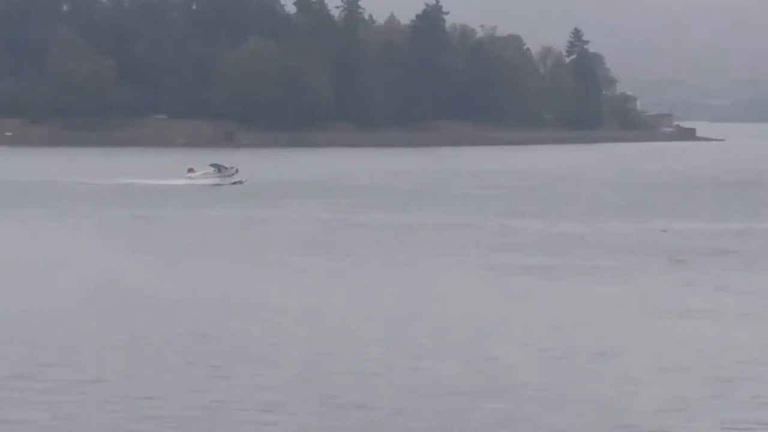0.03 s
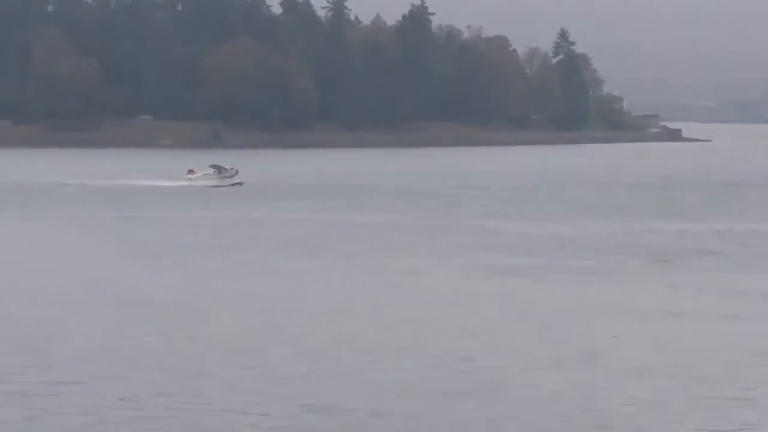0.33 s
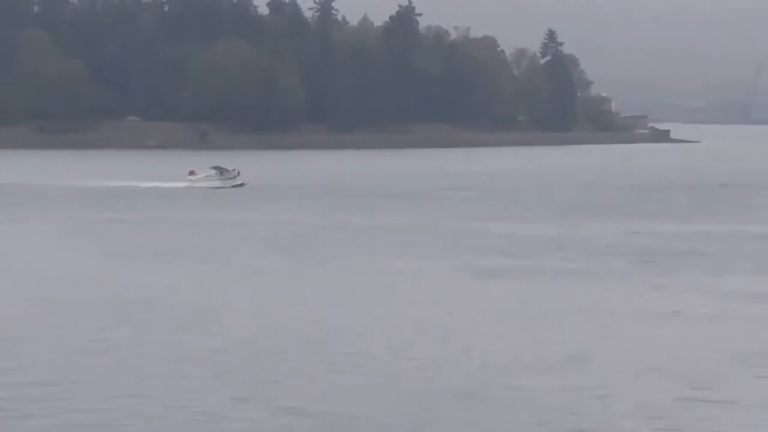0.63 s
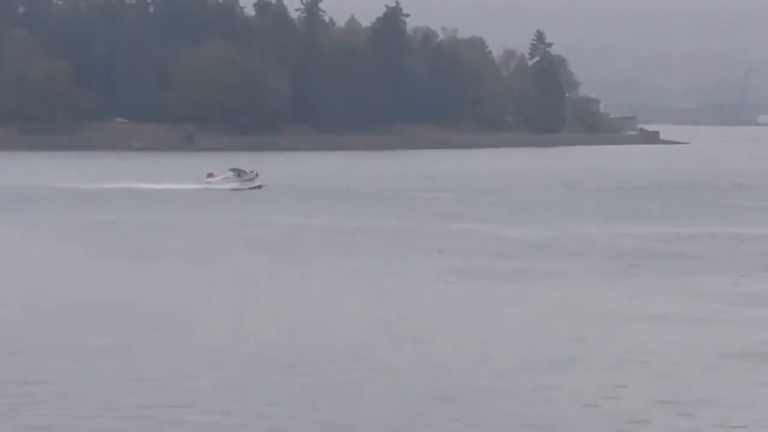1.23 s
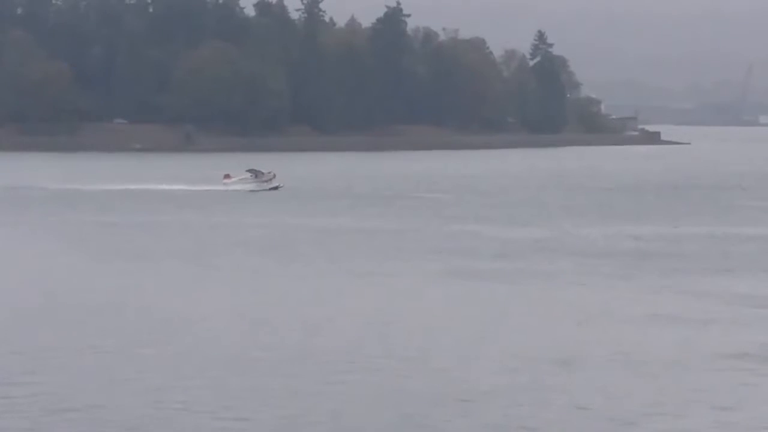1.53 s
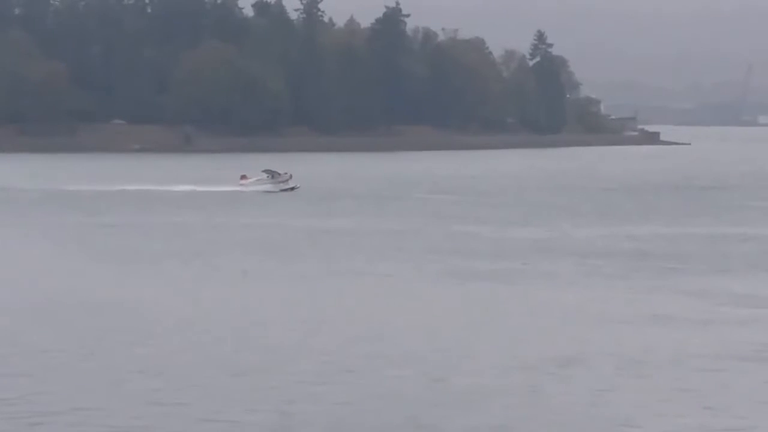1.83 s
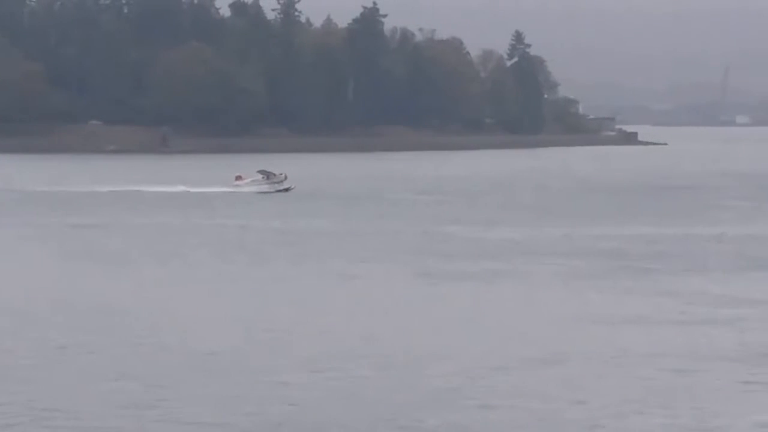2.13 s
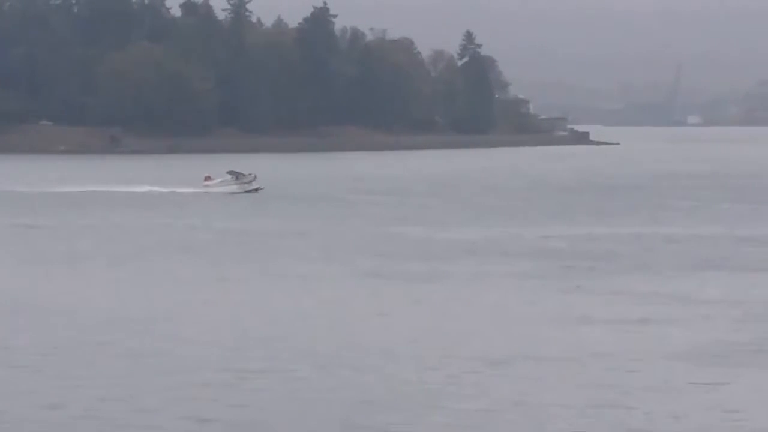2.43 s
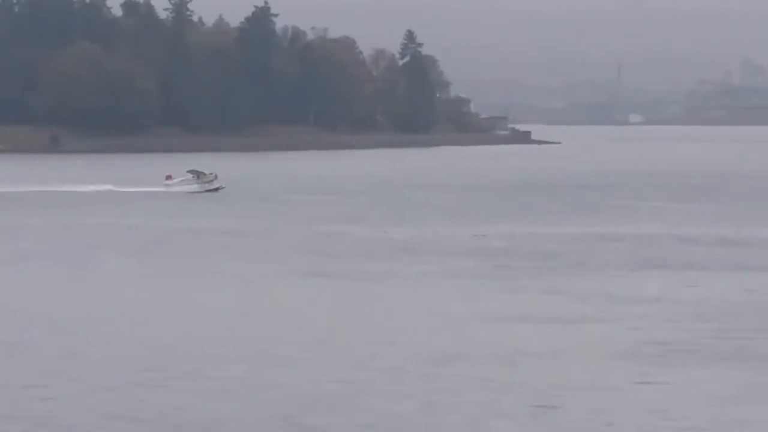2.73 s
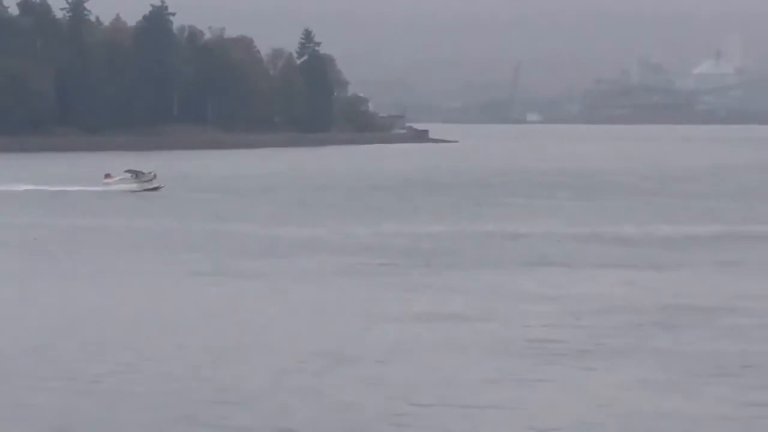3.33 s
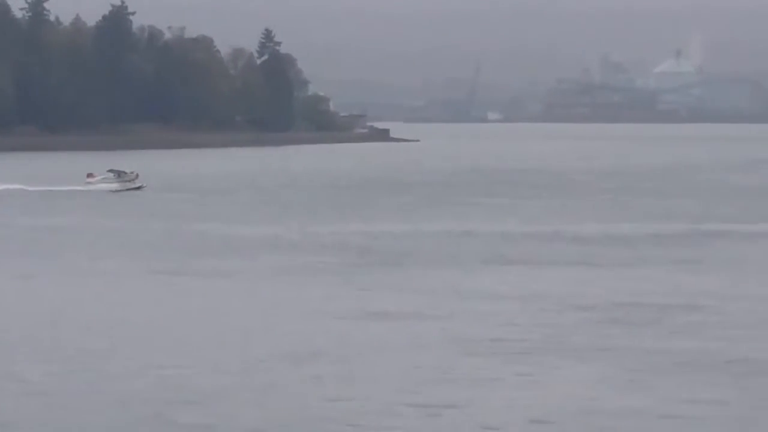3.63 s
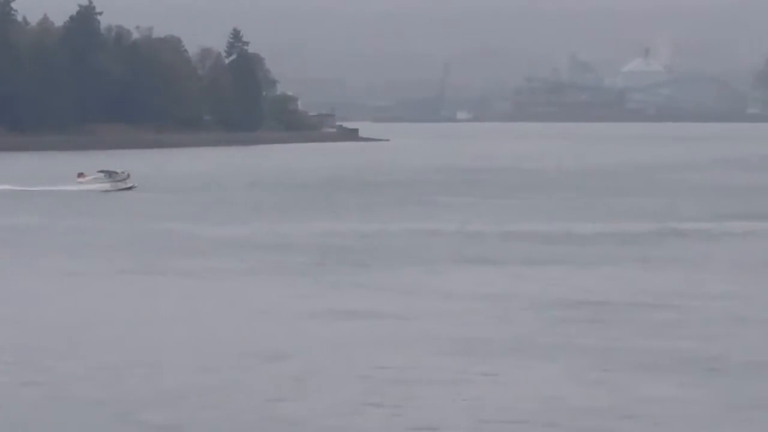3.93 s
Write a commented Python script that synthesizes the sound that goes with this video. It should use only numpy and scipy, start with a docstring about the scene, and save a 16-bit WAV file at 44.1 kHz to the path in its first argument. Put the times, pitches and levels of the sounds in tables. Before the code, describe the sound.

A distant small seaplane drones throughout, its propeller buzz wavering over a burbling exhaust. From about 1.3 seconds it turns raspier and louder, rising slightly in pitch and peaking around 3 to 4 seconds. Underneath, heard from a ship's deck, are a low hum, wind rumble and steady water hiss. A wave sloshes softly at about 0.7 seconds, and a drop ticks faintly nearby at 1.5 seconds.

```python
"""On a ship's deck: far across the water a small seaplane runs up for take-off.
Its three-blade propeller, one pressure pulse per blade, drones and rasps ever louder, with puffs of
torn air and tip cracks, while the nine-cylinder exhaust burble recedes. Moving air makes the overtones
swell and fade. The ship hums, wind rumbles, water hisses, a wave sloshes, a drop ticks nearby."""
import sys
import numpy as np
from scipy.fft import rfft, irfft, next_fast_len
from scipy.io import wavfile
from scipy.ndimage import uniform_filter1d, minimum_filter1d, map_coordinates

SR = 44100
rng = np.random.default_rng(int(sys.argv[2]) if len(sys.argv) > 2 else 0)


def digitize_waveform(pressure):
    """Quantize a signal to 16-bit integers and store it at the path in sys.argv[1].

    Rows of a 2-D input are taken as channels; values are limited to [-1, 1].
    """
    field = np.atleast_2d(pressure).T
    bounded = np.clip(field, -1, 1)
    quanta = np.round(bounded * 32767).astype(np.int16)
    wavfile.write(sys.argv[1], SR, quanta)


N = 176400

# blade-passing rate: time_s, pitch_hz
BLADE_RATE_HZ = [(0.1, 111.2), (1.3, 113.4), (1.57, 114.9), (3.28, 118.6), (3.67, 118.9), (3.96, 117.5)]
# blade pulse spectrum before and after the plane swings: overtone, relative_db
EARLY_PULSE_DB = [(4, -28), (6, -25), (7, -23), (8, -35.5), (9, -27), (10, -33), (12, -25), (13, -47),
                  (19, -52), (21, -60), (36, -66.5)]
LATE_PULSE_DB = [(4, -24), (6, -19), (7, -27.5), (8, -23.5), (9, -27), (10, -34), (11, -24.5), (13, -28),
                 (14, -33.5), (18, -38), (20, -52.5), (29, -53.5), (39, -63), (55, -72.5)]
# propeller registers, low to high, before trim: time_s, level_db
SECOND_DB = [(0.06, -23), (0.55, -28), (0.74, -19.5), (1.29, -23), (2.67, -12), (3.3, -11.5), (3.55, -10.5),
             (3.96, -17)]
THIRD_DB = [(0.06, -19), (0.59, -16.5), (0.67, -26.5), (1.07, -13.5), (1.47, -26), (1.54, -32),
            (1.7, -24.5), (2.16, -16), (2.95, -12), (3.44, -18.5), (3.96, -16)]
FIFTH_DB = [(0.04, -28), (0.5, -19.5), (1.66, -21), (1.99, -15), (2.73, -27.5), (2.88, -43), (2.99, -28),
            (3.09, -28), (3.108, -37), (3.3, -16.5), (3.46, -14), (3.54, -22), (3.89, -17), (3.96, -28.5)]
BLARE_DB = [(0.04, -29), (0.42, -23.5), (0.62, -30), (0.9, -23), (1.45, -17.5), (2.0, -22), (2.6, -19.5),
            (2.82, -27), (3.05, -18.5), (3.3, -20.5), (3.7, -12), (3.97, -15)]
BARK_DB = [(0.04, -37), (0.45, -39.5), (0.7, -29.5), (1.05, -36.5), (1.45, -20), (1.75, -28), (2.05, -25),
           (2.45, -25), (2.72, -21), (3.2, -22.5), (3.5, -30), (3.78, -16.5), (3.97, -18)]
RASP_DB = [(0.04, -37.5), (0.45, -36), (0.7, -28.5), (1.05, -34.5), (1.35, -23), (1.85, -25), (2.3, -21),
           (2.52, -31), (3.0, -20), (3.4, -22.5), (3.65, -22), (3.8, -25), (3.97, -19)]
EDGE_DB = [(0.04, -41.5), (1.1, -39), (1.35, -27), (1.6, -27), (1.8, -37.5), (2.05, -28.5), (2.43, -31.5),
           (2.89, -23), (3.1, -28), (3.61, -25), (3.97, -25)]
SIZZLE_DB = [(1.1, -56.5), (1.9, -40.5), (2.6, -39.5), (2.85, -31), (3.1, -35.5), (3.3, -33), (3.52, -31),
             (3.649, -31.5), (3.75, -34), (4, -40)]
# one per register, same order: trim_db
REGISTER_TRIM_DB = [-1.2, -2.24, 0.03, 1, 0.47, 0.97, 0.48, 1]
# phase drift from scattered paths: freq_hz, spread_rad
SMEAR_RAD = [(300, 1), (900, 0.43), (2200, 0.1), (4000, 1)]
# path skew of each pulse, bass first leading, later trailing: time_s, lag_s
BASS_LAG_S = [(1.5, -0.00057), (2.2, -0.00084), (2.9, 0), (3.7, .004)]
# exhaust lines: engine_cycle_multiple, relative_db
EXHAUST_LINES_DB = [(7, -21), (8, -17.5), (9, 0), (10, -13), (11, -5.5), (13, -24), (14, -1.5), (15, -17),
                    (16, -3.5), (17, -13), (22, -12), (23, -23)]
# exhaust envelopes: time_s, level_db
FIRING_DB = [(0, -25.5), (.6, -28.5), (1.5, -35), (2.2, -41), (2.7, -37), (3.4, -32.5), (4, -32.5)]
SIDE_LINES_DB = [(0, -27.5), (1.1, -26.5), (1.6, -35.5), (2.0, -44), (2.7, -31), (3.4, -31), (4, -41)]
# noise spectra: freq_hz, relative_density_db
CHOP_SPECTRUM_DB = [(150, -43), (300, 3), (600, -6.5), (1300, -7), (2000, -0.5), (2500, -20.5),
                    (3300, -12.5), (4500, -25.5), (8000, -44)]
WASH_SPECTRUM_DB = [(60, -17), (150, -7.5), (220, 1.5), (330, -2), (500, -5.5), (800, -8), (2000, -15),
                    (2600, -41.5)]
RUMBLE_SPECTRUM_DB = [(20, -23), (45, -9.5), (65, -7.5), (100, -0.5), (140, -5.5), (220, -6.5), (500, -51)]
WATER_SPECTRUM_DB = [(1500, -6), (2500, 3), (3800, -4), (6800, -1), (7800, -7), (12000, -17), (15000, -35)]
SLOSH_SPECTRUM_DB = [(900, -12), (2000, 2), (2700, -1), (3500, -13), (6500, -9), (12000, -31)]
TIP_SPECTRUM_DB = [(2000, -25), (2700, 4), (3300, 5), (4200, -7), (5500, -13), (8000, -36)]
DROP_SPECTRUM_DB = [(3000, -20), (6000, 0), (10000, 1), (15000, -10)]
# noise envelopes: time_s, base_level_db
WASH_DB = [(0, -30.5), (1.2, -26), (2, -33), (3, -33), (4, -27.5)]
RUMBLE_DB = [(0, -34), (1.0, -38), (1.7, -42), (2.3, -34), (3.0, -38.5), (4, -44)]
WATER_DB = [(0.05, -45.5), (0.92, -43.5), (1.9, -48), (2.2, -46), (3.0, -46), (3.9, -46.5)]
TIP_DB = [(0, -75), (1.0, -49), (1.3, -37.5), (1.5, -53), (2.08, -45.5), (2.4, -60), (2.85, -44.5),
          (3.6, -48), (4, -46)]
# left-right likeness of noise: freq_hz, correlation
COHERENCE = [(50, 0.54), (300, 1), (1000, 0.69), (2500, 0.17), (6000, 0.023), (14000, 0.041)]
# microphone port mismatch: freq_hz, left_minus_right_db
PORT_BALANCE_DB = [(60, -1), (120, -3), (235, -2), (350, -4), (580, 0.5), (1100, -0.5), (1700, 0),
                   (2300, -4), (4000, -2), (9000, 1)]

BLADES, CYLINDERS = 3, 9
TIME_S = np.arange(N) / SR
FRAME_S = np.linspace(0, N / SR, 240)


def amp(db):
    """Decibels to gain."""
    return 10 ** (np.asarray(db) / 20)


def unit(x):
    """Scale to rms 1."""
    return x / np.sqrt(np.mean(x ** 2) + 1e-20)


def along(rows, hz):
    """Interpolate rows on a log axis."""
    knots_hz, values = np.transpose(rows)
    return np.interp(np.log(hz + 1), np.log(knots_hz + 1), values)


def curve(rows, time_s=TIME_S):
    """Interpolate rows in time."""
    return np.interp(time_s, *np.transpose(rows))


def wobble(knots_per_s):
    """Smooth random curve."""
    grid_s = np.linspace(0, N / SR, 1600)
    smooth = map_coordinates(rng.standard_normal(1024), [grid_s * knots_per_s + 2], mode="wrap")
    return np.interp(TIME_S, grid_s, smooth)


def filtered(x, response):
    """Apply a frequency response."""
    size = next_fast_len(N + SR // 4)
    return irfft(rfft(x, size) * response(np.fft.rfftfreq(size, 1 / SR)), size)[..., :N]


def noise(spectrum_db):
    """Stereo noise of rms 1, near mono in the low mids, wide in the treble."""
    def response(hz):
        width_rad = np.arccos(np.clip(along(COHERENCE, hz), -1, 1)) / 2
        return amp(along(spectrum_db, hz)) * [np.cos(width_rad), np.sin(width_rad)]
    mid, side = filtered(rng.standard_normal((2, N)), response)
    return unit(np.array([mid + side, mid - side]))


def fading(knots_per_s, count, span):
    """Slow complex gains [common/left/right, overtone, frame], alike over span overtones."""
    real, imag = rng.standard_normal((2, 3, count, 64))
    knots = uniform_filter1d(real + 1j * imag, size=span, axis=1) * np.sqrt(span / 2)
    weights = np.exp(-2 * (np.arange(64)[:, None] - 2 - FRAME_S * knots_per_s) ** 2)
    return knots @ (weights / np.linalg.norm(weights, axis=0))


def pulse_train(gains, cycles, size=1024):
    """One pulse per cycle, shaped by gains [port, overtone, frame]."""
    shapes = irfft(gains, size, axis=1) * size / np.sqrt(2)
    shapes = np.concatenate([shapes, shapes[:, :1]], axis=1)
    position = [cycles % 1 * size, np.linspace(0, gains.shape[-1] - 1, N)]
    return np.array([map_coordinates(shape, position, order=1, mode="nearest") for shape in shapes])


def air_paths(hz, echo_s=.0034, skew_hz=868, full_fade_hz=1300, dip_db=5, dip_hz=1000):
    """Gains per port: moving air fades the overtones, treble most; extra paths shift their phases."""
    air = fading(5.5, len(hz), span=3)
    drift = np.sqrt(2) * fading(1.007, len(hz), span=2).real
    height = np.minimum(hz / full_fade_hz, 1)
    depth = .9 * height
    fade = (1 + depth * (air[0] + .75 * air[1:])) / np.sqrt(1 + depth ** 2)
    echo_rad = np.angle(1 + .4 * np.exp(-2j * np.pi * hz * echo_s))
    smear_rad = along(SMEAR_RAD, hz) * drift[0] + .57 * height ** .38 * drift[1:]
    skew_rad = 2 * np.pi * curve(BASS_LAG_S, FRAME_S) * skew_hz * (np.exp(-hz / skew_hz) - np.exp(-1))
    dips = np.clip(2 * fading(7, len(hz), span=1)[0].real, 0, 2) ** 2  # lone overtones sink and return
    midrange = np.exp(-2 * np.log2((hz + 1) / dip_hz) ** 2)
    return fade * amp(-dip_db * midrange * dips) * np.exp(1j * (echo_rad + smear_rad + skew_rad))


def propeller(passes, swing_start_s=.1, swing_end_s=3.07, jitter_s=.00002):
    """One pressure pulse per blade, uneven in time and size; each register swells on its own curve."""
    overtone = np.arange(56)[:, None]
    swing = np.clip((FRAME_S - swing_start_s) / (swing_end_s - swing_start_s), 0, 1)
    pulse_db = (1 - swing) * along(EARLY_PULSE_DB, overtone) + swing * along(LATE_PULSE_DB, overtone)
    gains = -1j * amp(pulse_db) * air_paths(overtone * curve(BLADE_RATE_HZ, FRAME_S))
    power = (abs(gains) ** 2).mean(0)
    registers = [([2], SECOND_DB), ([3], THIRD_DB), ([5], FIFTH_DB), ([4, 6, 7], BLARE_DB),
                 ([8, 9, 10], BARK_DB), (range(11, 15), RASP_DB), (range(15, 21), EDGE_DB),
                 (range(21, 56), SIZZLE_DB)]
    for (members, envelope_db), trim_db in zip(registers, REGISTER_TRIM_DB):
        gains[:, members] *= amp(curve(envelope_db, FRAME_S) + trim_db) / np.sqrt(power[members].sum(0))
    fundamental_db = -28.5 - 3.5 * FRAME_S
    gains[:, 1] *= amp(fundamental_db) / np.sqrt(power[1])
    passes = passes + jitter_s * curve(BLADE_RATE_HZ) * wobble(100)
    uneven_db = 1.2 * wobble(110) - np.cos(2 * np.pi * passes / BLADES)  # scatter, one weak blade
    bands = [(overtone < 9, .31), ((overtone >= 9) & (overtone < 22), 1), (overtone >= 22, 1.1)]
    return sum(pulse_train(gains * band, passes) * unit(amp(share * uneven_db)) for band, share in bands)


def exhaust(passes, burble_per_s=6.4, burble_depth=.64):
    """Nine unequal cylinders fire every two shaft turns: a firing line among burbling side lines."""
    gains = np.zeros((1, 41, len(FRAME_S)), complex)
    wavers = fading(burble_per_s, len(EXHAUST_LINES_DB), span=1)[0]
    for (multiple, relative_db), waver in zip(EXHAUST_LINES_DB, wavers):
        envelope_db = FIRING_DB if multiple == CYLINDERS else SIDE_LINES_DB
        line = amp(curve(envelope_db, FRAME_S) + relative_db) * (1 + burble_depth * waver)
        gains[0, multiple] = line * np.exp(2j * np.pi * rng.random())
    return pulse_train(gains, passes / (2 * BLADES))


def blade_chop(passes, base_db=-34, sharpness=1.6):
    """Turbulent air torn off in one puff per blade, one blade harder than the others."""
    puffs = np.exp(sharpness * np.cos(2 * np.pi * (passes - .08)))
    sizes = 1 + .89 * np.cos(2 * np.pi * passes / BLADES)
    edge_db = curve(EDGE_DB)
    swell_db = .33 * (edge_db - edge_db.mean())
    return amp(base_db + swell_db) * unit(puffs * sizes) * noise(CHOP_SPECTRUM_DB)


def engine_wash():
    """Scattered engine noise, without pulses."""
    return amp(curve(WASH_DB)) * noise(WASH_SPECTRUM_DB)


def rumble(waver_db=.78):
    """Low noise of wind and ship."""
    return amp(curve(RUMBLE_DB) + waver_db * wobble(7.25)) * noise(RUMBLE_SPECTRUM_DB)


def ship_hum(pitch_hz=105.2, rms_db=-39.5, waver_db=1.3):
    """One low tone from the ship, wavering in level and phase."""
    peak = np.sqrt(2) * amp(rms_db + waver_db * wobble(3.8))
    return peak * np.sin(2 * np.pi * pitch_hz * TIME_S + .5 * wobble(3.3))


def water_hiss(trim_db=8, flicker_db=.75):
    """Bright, flickering hiss of the water."""
    return amp(curve(WATER_DB) + trim_db + flicker_db * wobble(13)) * noise(WATER_SPECTRUM_DB)


def slosh(peak_s=.71, sigma_s=.076, peak_db=-34):
    """A wave washes against the hull: a soft swell of foam."""
    return amp(peak_db) * np.exp(-.5 * ((TIME_S - peak_s) / sigma_s) ** 2) * noise(SLOSH_SPECTRUM_DB)


def tip_cracks(passes, sharpness=3.9, scatter_db=3):
    """Short bright cracks from the blade tips, strongest once per shaft turn."""
    cracks = np.exp(sharpness * (np.cos(2 * np.pi * (passes - .05)) - 1))
    sizes = np.exp(.45 * np.cos(2 * np.pi * passes / BLADES)) * amp(scatter_db * np.tanh(wobble(110)))
    return amp(curve(TIP_DB)) * unit(cracks * sizes) * noise(TIP_SPECTRUM_DB)


def drop(peak_s=1.519, tick_db=-27.5, spray_db=-48.5):
    """A drop's faint bright tick inside a short spit of spray."""
    offset_s = TIME_S - peak_s
    tick = amp(tick_db) * np.exp(-abs(offset_s) / .00056)
    spray = amp(spray_db) * np.exp(-abs(offset_s + .004) / .021)
    return (tick + spray) * noise(DROP_SPECTRUM_DB)


def scene():
    """The plane, a little left of centre, over the sounds around the deck."""
    passes = np.cumsum(curve(BLADE_RATE_HZ)) / SR
    lead_s = np.array([[25e-6], [-25e-6]])  # left port hears the plane first
    drone = filtered(propeller(passes) + exhaust(passes), lambda hz: np.exp(2j * np.pi * hz * lead_s))
    plane = drone + blade_chop(passes) + tip_cracks(passes) + engine_wash()
    return plane + rumble() + ship_hum() + water_hiss() + slosh() + drop()


def record(dry):
    """Two unequal microphone ports, a quick peak limiter and a band limit."""
    ceiling, hold_s, cutoff_hz = .93, .012, 15400
    ports = filtered(dry, lambda hz: amp(along(PORT_BALANCE_DB, hz) * np.array([[.5], [-.5]])))
    hold = round(hold_s * SR)
    needed_gain = ceiling / np.maximum(abs(ports).max(0), ceiling)
    gain = uniform_filter1d(minimum_filter1d(needed_gain, 2 * hold), hold)
    return filtered(ports * gain, lambda hz: hz < cutoff_hz)


dry = scene()
out = record(dry)
digitize_waveform(out)
```